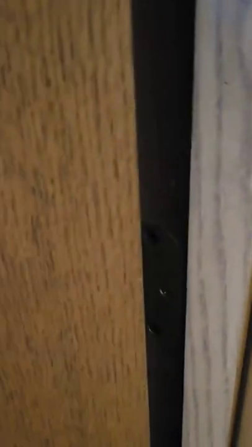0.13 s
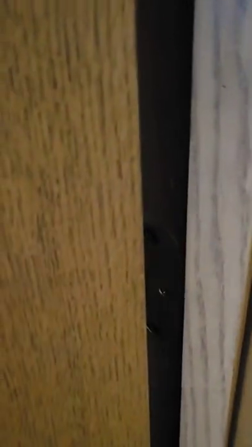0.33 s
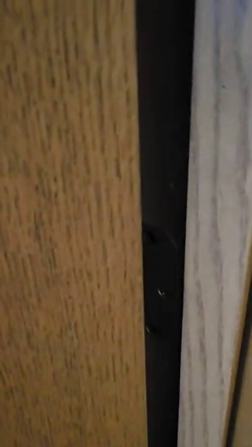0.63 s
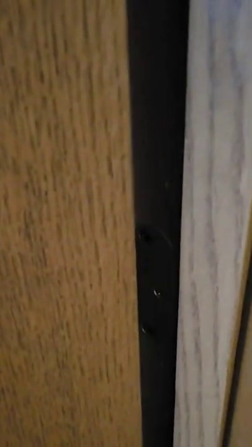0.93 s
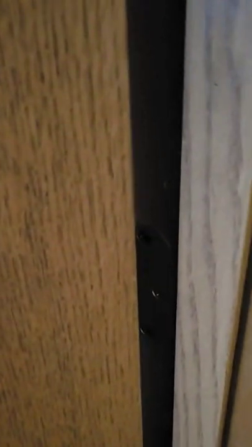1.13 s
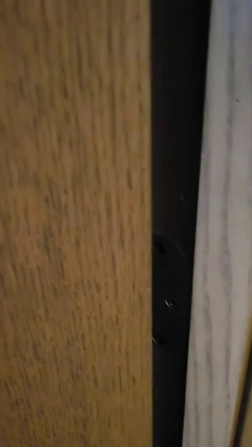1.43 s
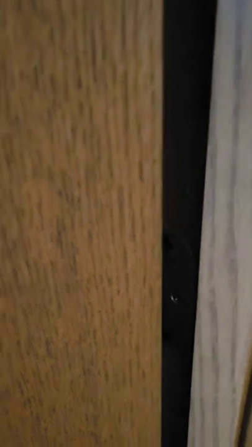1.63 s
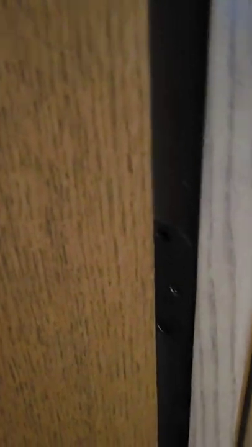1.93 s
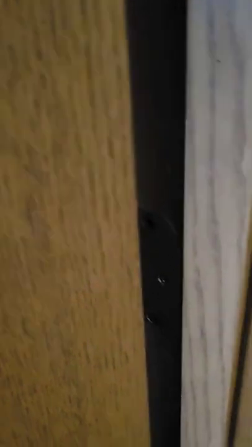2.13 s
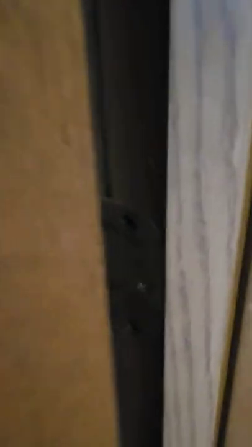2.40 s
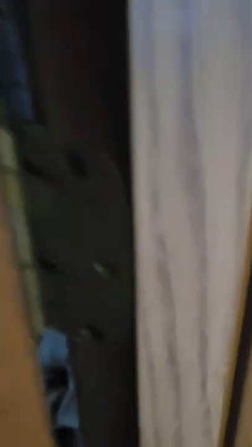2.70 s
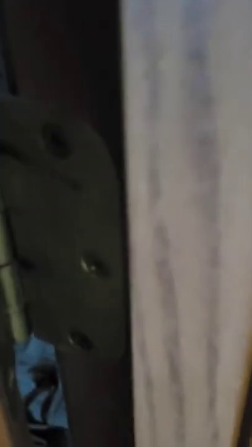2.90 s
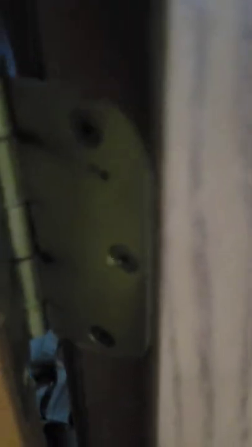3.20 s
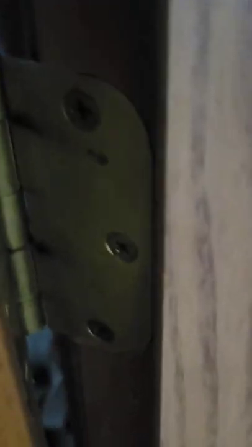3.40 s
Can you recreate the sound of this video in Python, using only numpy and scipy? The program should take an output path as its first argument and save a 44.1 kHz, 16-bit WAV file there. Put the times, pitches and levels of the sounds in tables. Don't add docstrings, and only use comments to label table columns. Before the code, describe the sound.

Squealing metal door hinge, small repeated squeaks followed by one loud falling creak, close up

```python
import sys
import numpy as np
from scipy import signal
from scipy.fft import rfft, irfft
from scipy.io import wavfile
from scipy.ndimage import uniform_filter1d

SR = 44100
rng = np.random.default_rng(int(sys.argv[2]) if len(sys.argv) > 2 else 0)


def level_to_linear(level):
    exponent = np.asarray(level, float) / 20
    return 10 ** exponent


def materialize(psi):
    bounded = np.clip(np.atleast_2d(psi).T, -1, 1)
    quanta = np.round(bounded * 32767).astype(np.int16)
    wavfile.write(sys.argv[1], SR, quanta)


N = 156555

LONG_SWING_S, WIDE_OPEN_S = 2.4, 2.5


def level(x, db):
    return x * level_to_linear(db) / np.sqrt(np.mean(x ** 2))


def walk(rate, size=N):
    hold = max(int(SR / rate), 2)
    steps = np.repeat(rng.standard_normal(size // hold + 1), hold)
    return 1.277 * uniform_filter1d(uniform_filter1d(steps, hold), hold)[:size]


def colour(points, hz):
    p = np.array(points)
    return level_to_linear(np.interp(np.log(hz + 1), np.log(p[:, 0]), p[:, 1]))


def tilt(hz, treble_db, s):
    octaves = np.log2((hz + 20) / 2730)
    bass_db = -2.6 if s > WIDE_OPEN_S else -4
    return level_to_linear(np.where(octaves > 0, treble_db, bass_db) * octaves)


def tail(x, t60, db):
    t = np.arange(SR // 2) / SR
    response = rng.standard_normal(len(t)) * np.exp(-np.log(1000) * t / t60)
    return signal.fftconvolve(x, response * level_to_linear(db) / np.sqrt(np.sum(response ** 2)))[:N]


def read(rows, fade_s=0.0021, lap_s=0):
    rows = np.array(rows, float)
    first = int(max(rows[0, 0] - lap_s, 0) * SR)
    at = np.arange(first, min(int((rows[-1, 0] + lap_s) * SR), N))
    cols = [uniform_filter1d(np.interp(at / SR, rows[:, 0], c), size=300, mode="nearest") for c in rows.T[1:]]
    since_start = at - at[0] + SR * (at[0] == 0)
    until_end = at[-1] - at + SR * (at[-1] == N - 1)
    edge = np.clip(np.minimum(since_start, until_end) / (fade_s * SR), 0, 1)
    return at, 2 * np.pi * np.cumsum(cols[0]) / SR, edge, cols


def arch(start, top, end, hz, db):
    t = np.arange(start, end, 1 / 500)
    rise = np.clip((top - t) / (top - start), 0, 1)
    fall = np.clip((t - top) / (end - top), 0, 1)
    share = 1 - (1 - .76) * rise ** 2.4 - (1 - .9) * fall ** 2.51
    return np.c_[t, hz * share, np.full(len(t), db)]


# [start t/s, fastest t/s, end t/s, top slip rate f/Hz, level/dB]
PUSHES = [
    (0.349, 0.418, .458, 1865, -44.5),
    (0.712, 0.771, .836, 1868, -45.5),
    (1.162, 1.217, 1.261, 1787, -46.5),
    (1.606, 1.633, 1.686, 1766, -45.5),
]
# [t/s, slip rate f/Hz, level/dB]
ROCKING = [
    [(0.0, 1802, -42), (0.056, 1759, -40.5), (0.088, 1274, -44.5)],
    [(1.574, 860, -59), (1.584, 919, -49.5), (1.606, 947, -39)],
    [(2.063, 672, -50), (2.086, 602, -44.5), (2.115, 495, -42)],
]
# [t/s, slip rate f/Hz, level/dB]
SWING_HIGH = [
    [(2.46, 2203, -66), (2.485, 2128, -44), (2.55, 2114, -41.5), (2.63, 2135, -40), (2.69, 2129, -41.5),
     (2.72, 2212, -46), (2.76, 2175, -41), (2.79, 2142, -41)],
    [(2.799, 1662, -37), (2.86, 1636, -33), (2.92, 1611, -29.5), (2.944, 1350, -35)],
]
# [t/s, slip rate f/Hz, level/dB]
SWING_FALLING = [
    [(2.951, 1002, -32), (2.991, 954, -37), (3.018, 939, -36.5)],
    [(3.027, 669, -32), (3.067, 652, -33), (3.102, 633.2, -31.5)],
    [(3.112, 492, -30.5), (3.14, 480, -29.5), (3.172, 457, -29.5)],
]
# [t/s, slip rate f/Hz, level/dB]
SWING_LOWEST = [
    [(3.181, 389.4, -34), (3.2, 350, -31.5), (3.222, 311.6, -33.5)],
]
# [t/s, slip rate f/Hz, level/dB]
SWING_AGAIN = [
    [(3.425, 855, -47.5), (3.428, 846, -34.5), (3.435, 876, -54)],
    [(3.441, 877, -46.5), (3.462, 1000, -39)],
    [(3.471, 1320, -44), (3.55, 1354, -34.5)],
]
# [treble tilt dB/octave, scrape noise level/dB]
GRIP = [(-7, -8.5), (-11.5, -14), (-8, -18), (-13.5, -9), (-4, -19), (-8, -20), (-11.5, -7.5), (-8.5, -24),
        (3.5, -27), (-4.5, -12), (-2, -16.5), (-2.5, -14.5), (-0.5, -16), (-12, -3), (-11.5, -27),
        (-3, -19)]
SHAPE = [(-3.5, 3, 0.5, -1, -2), (-5.5, 0, -4, -3, -5.5), (2, 6, 3.5, 4, 2), (1.5, 4, -0.5, 1, 3),
         (3, 6, 1.5, 3.5, -5.5), (-7, -2, -7, 0, 0), (1, -18, -2, 1, 1), (-0.5, -1.5, -3.5, -4, 4),
         (1, 6.5, -0.5, 1.5, -1), (-1, -8, 1.5, 3, 1), (2.5, 0, -3.5, -3, -2.5), (7.5, -5, -6, -12.5, -11),
         (5, 3.5, 2.5, 2, -10), (-3, -15, 4, -2, 4), (1.5, -1, 3, 1, 5.5), (-1, 4, 7, 2, 0)]
GROUPS = {9: 2, 14: 2, 15: 3}


def squeals():
    out = np.zeros(N)
    pushes = [arch(*row) for row in PUSHES]
    curves = pushes + ROCKING + SWING_HIGH + SWING_FALLING + SWING_LOWEST + SWING_AGAIN
    for n, rows in enumerate(curves):
        treble_db, scrape_db = GRIP[n]
        group, s = GROUPS.get(n, 1), rows[0][0]
        at, phase, edge, (hz, db) = read(rows, lap_s=0.0047 * (s > WIDE_OPEN_S))
        size = len(at)

        steady = s > LONG_SWING_S
        glide = np.abs(np.gradient(np.log(hz))) * SR
        waver = 0.00333 * (.5 if steady else 1) * (1 + 0.28 * glide) * walk(258, size=size)
        stumble = 0.00369 * np.minimum(glide, 8) * walk(121.1, size=size)
        phase = phase + np.cumsum((waver + stumble) * hz) * 2 * np.pi / SR

        k = np.arange(1, int(16000 * group / hz.min()) + 1)[:, None] / group
        gain = tilt(k * hz, treble_db, s) * level_to_linear(-21 * (k % 1 > 0)) * (k * hz < 17000)
        gain = gain * level_to_linear(np.interp(k, np.arange(1, 7), [*SHAPE[n], 0]))
        flicker_db = 3 * (0.32 if steady else 1)
        gain = gain * level_to_linear(flicker_db * np.array([walk(69.0, size=size) for _ in k]))
        train = (gain * np.cos(k * phase)).sum(0) / np.sqrt((gain ** 2).sum(0) / 2)

        noise = rfft((1 + np.cos(phase)) * rng.standard_normal(size))
        noise = irfft(noise * tilt(np.fft.rfftfreq(size, 1 / SR), treble_db, s), size)
        scrape = level(noise, scrape_db) * (1 + 0.1 * glide)
        out[at] += (train + scrape) * edge * level_to_linear(db + 0.86 * walk(73.0, size=size))
    return out


def clicks(times, gains, treble_db):
    out = np.zeros(N)
    np.add.at(out, np.clip((times * SR).astype(int), 0, N - 1), gains)
    return irfft(rfft(out) * tilt(np.fft.rfftfreq(N, 1 / SR), treble_db, times[0]), N)


# [start t/s, last slip t/s, first slip rate f/Hz, last slip rate f/Hz, level/dB]
CREAKS = [
    (0.085, 0.11, 687, 307, -38.5),
    (0.459, 0.4868, 719, 215.5, -40.5),
    (0.835, 0.86, 690, 304, -44),
    (1.259, 1.305, 556, 145.4, -39),
    (1.685, 1.711, 611, 254.7, -46),
    (2.116, 2.143, 457, 167.6, -40.5),
    (2.762, 2.794, 595, 553, -44),
    (3.2274, 3.288, 315.7, 105.3, -32.5),
]
# [t/s, level/dB]
TICKS = [
    (0.1225, -29),
    (0.5055, -40),
    (0.877, -46),
    (1.329, -36),
    (1.7272, -39.5),
    (2.171, -29.5),
]


def creaks():
    dull_db, bright_db = -12, -2.5
    ticks = np.array(TICKS)
    out = clicks(ticks[:, 0], level_to_linear(ticks[:, 1] + 13), dull_db)
    for start, last, first_hz, last_hz, db in CREAKS:
        brake = (first_hz - last_hz) / (last - start)
        rate = np.sqrt(last_hz ** 2 + 2 * brake * np.arange(40))
        jitter, scatter = rng.standard_normal((2, 40))
        times = last - (rate - last_hz) / brake + 0.04 * jitter / rate
        gains = level_to_linear(db + 1.5 * scatter) * np.sqrt(SR / first_hz) * (first_hz / rate) ** 0.32
        gains = gains * (times > start)
        if 2.7 < start < 2.8:
            gains = gains * np.clip((times - start) / 0.023, 0, 1)
        treble_db = bright_db if start > LONG_SWING_S else dull_db + 4 * (start > 2)
        out += clicks(times, gains, treble_db)
    return out


# [f/Hz, width f/Hz, level/dB]
LEAF_MODES = [(4200, 230, -5), (1436, 57, -1.5), (1700, 220, -1), (1858, 43.6, 15.5), (2135, 154, 4.5),
              (2590, 540, -0.5), (3200, 55, -7), (3900, 740, -1.5), (4590, 200, -1.5), (5235, 440, 0),
              (5630, 106, 5.5), (6410, 850, -3.5), (7376, 530, 8), (11200, 93, -2.5), (7470, 230, 2.5)]
# [f/Hz, level/dB]
PANEL = [(300, -25.5), (900, -6), (1600, -3.5), (3000, 2.5), (5000, 2.5), (8000, -5), (11000, -6.5),
         (15500, -10)]


def hinge(slips):
    hz = np.fft.rfftfreq(N, 1 / SR)
    ring = level_to_linear(-3)
    for f, width, db in LEAF_MODES:
        ring = ring + level_to_linear(db) * 1j * hz * width / (f ** 2 - hz ** 2 + 1j * hz * width)
    jamb_echo = level_to_linear(-11) * np.exp(-2j * np.pi * hz * .0026)
    ring = ring * (1 + jamb_echo) * colour(PANEL, hz)

    click = np.eye(1, N)[0]
    crack = rfft(tail(click, .0025, 0))
    rattle = 0.5 + rfft(tail(click, 0.026, 0.5)) / (1 + 1j * hz / 4630) ** 2
    for smear in (crack, rattle):
        ring = ring * smear / np.hypot(np.abs(smear), .3)
    return irfft(rfft(slips) * ring, N)


# [t/s, f/Hz, level/dB, octave level/dB]
WHISTLES = [
    [(.2, 4040, -69, -88), (.212, 4105, -48, -63), (.228, 4060, -52.5, -61), (.25, 3920, -66, -74)],
    [(.95, 3976, -50.5, -55.5), (.984, 4045, -43, -49), (1.02, 4094, -45, -59), (1.045, 4090, -56.5, -67),
     (1.065, 3960, -69, -89)],
    [(1.802, 3996, -48, -50), (1.84, 4080, -38, -45.5), (1.875, 4176, -49, -57), (1.908, 4103, -42, -59),
     (1.935, 3960, -67, -70)],
]
# [t/s, f/Hz, level/dB, octave level/dB]
LONG_WHISTLE = [
    [(2.243, 3900, -57, -65), (2.262, 3988, -62, -50.5), (2.35, 4054, -72.5, -64), (2.48, 4000, -67, -68),
     (2.6, 4000, -59.5, -52), (2.73, 4080, -63.5, -60), (2.82, 4097, -59, -47), (2.86, 4200, -70, -80),
     (2.93, 4250, -73, -89)],
]
# [t/s, f/Hz, level/dB]
PEEP = [
    (1.02, 12882, -77),
    (1.128, 14300, -86),
    (1.19, 13400, -72),
    (1.22, 14400, -76),
    (1.31, 12900, -81),
]


def whistles():
    out = np.zeros(N)
    for n, rows in enumerate(WHISTLES + LONG_WHISTLE):
        is_long = n >= len(WHISTLES)
        at, phase, edge, (hz, db, octave_db) = read(rows, fade_s=0.012 if is_long else .0025)
        db = db + 14 * is_long + walk(44.5, size=len(at))
        twelfth = level_to_linear(-26.5 + 6.5 * is_long) * np.sin(3 * phase)
        tone = level_to_linear(db) * np.sin(phase) + level_to_linear(octave_db) * (np.sin(2 * phase) + twelfth)
        out[at] += 2 ** .5 * edge * tone
    at, phase, edge, (hz, db) = read(PEEP, fade_s=.03)
    out[at] += 2 ** .5 * edge * level_to_linear(db) * np.sin(phase)
    return out


# [f/Hz, level/dB per Hz]
AIR = [(18, -55), (30, -1), (81, -4.5), (202, -7.5), (256, -6.5), (728, -17.5), (1260, -25), (4660, -50.5),
       (15500, -64.5)]
# [f/Hz, level/dB]
HUM = [
    (62.9, -42.5),
    (58.6, -75),
    (120.2, -58.5),
    (278.5, -60.5),
    (373.6, -63),
]
# [t/s, f/Hz, level/dB]
BUMPS = [
    (0.181, 50.3, -35.5),
    (0.549, 50, -37.5),
    (2.32, 45, -66),
]


def room_tone():
    t = np.arange(N) / SR
    air = rfft(rng.standard_normal(N)) * colour(AIR, np.fft.rfftfreq(N, 1 / SR))
    out = level(irfft(air, N), -47.5)
    for n, (hz, db) in enumerate(HUM):
        wobble_db = 1.36 * (0.5 + (n > 0)) * walk(9 + 6 * n)
        phase = 2 * np.pi * np.cumsum(hz * (1 + 0.0121 * walk(7))) / SR
        out += 2 ** .5 * level_to_linear(db + wobble_db) * np.sin(phase)
    for s, hz, db in BUMPS:
        out += level_to_linear(db) * np.exp(-((t - s) / 0.051) ** 2) * np.sin(2 * np.pi * hz * (t - s))
    return out


def scene():
    body = hinge(squeals() + creaks())
    near = body + whistles() * (1 + 14 * body)
    room = tail(near, 0.32, -11.5)
    return np.tile(near + room + room_tone(), (2, 1))


def low_pass(x):
    return signal.sosfilt(signal.butter(12, 15500, fs=SR, output="sos"), x)


def record(dry):
    bass_cut = signal.butter(4, 42, "high", fs=SR, output="sos")
    mix = signal.sosfilt(bass_cut, dry)
    return low_pass(mix)


dry = scene()
out = record(dry)
materialize(out)
```